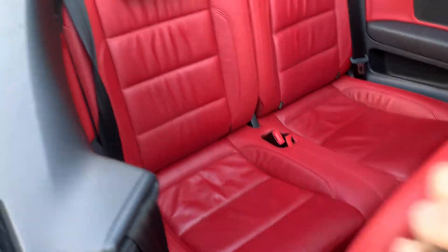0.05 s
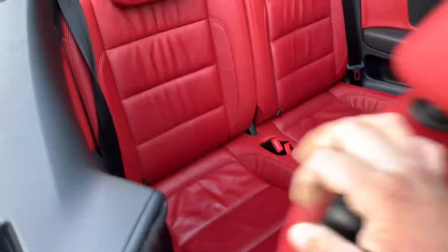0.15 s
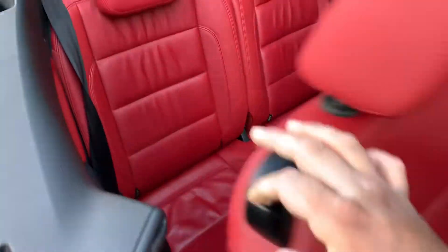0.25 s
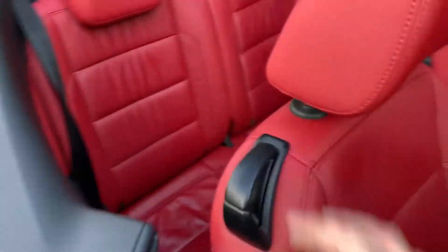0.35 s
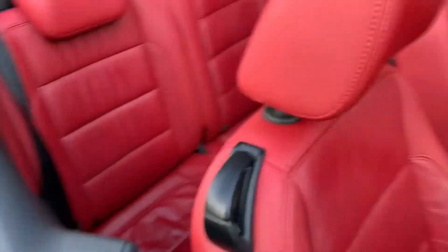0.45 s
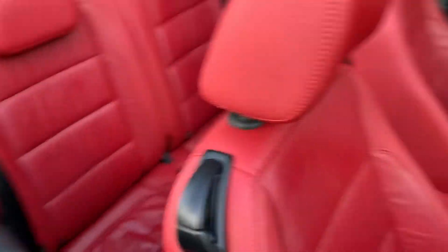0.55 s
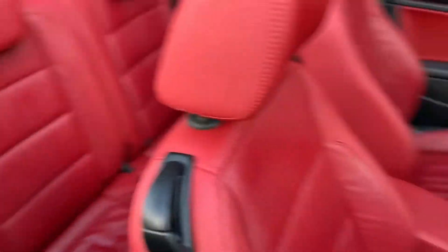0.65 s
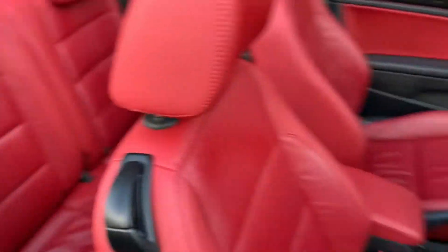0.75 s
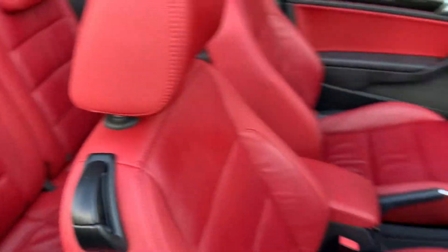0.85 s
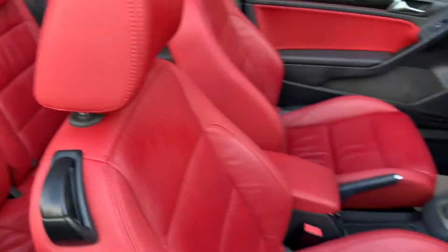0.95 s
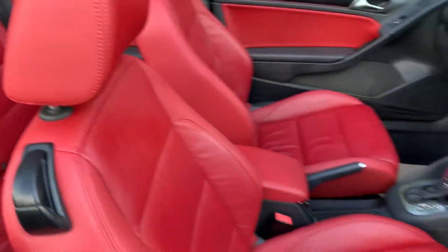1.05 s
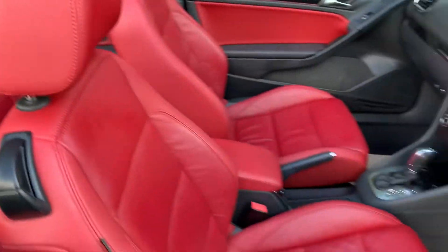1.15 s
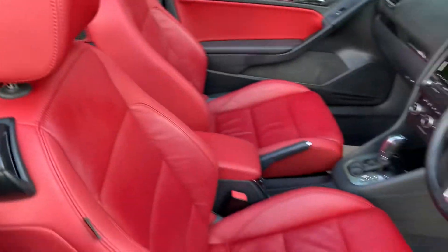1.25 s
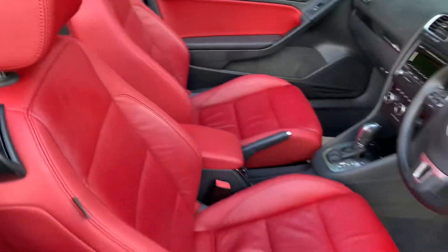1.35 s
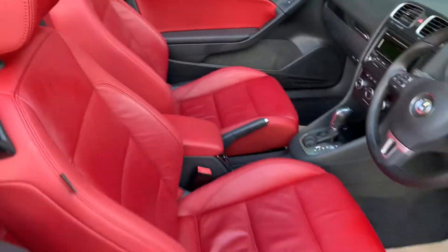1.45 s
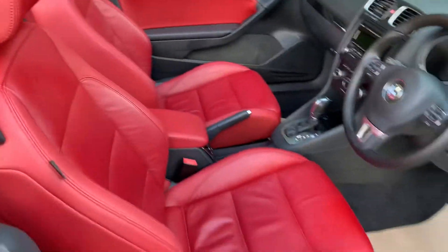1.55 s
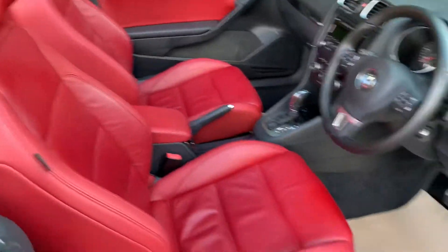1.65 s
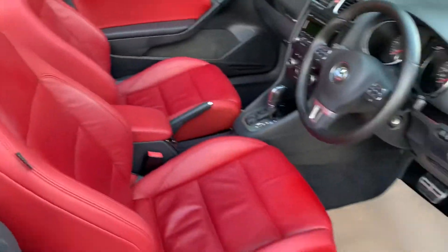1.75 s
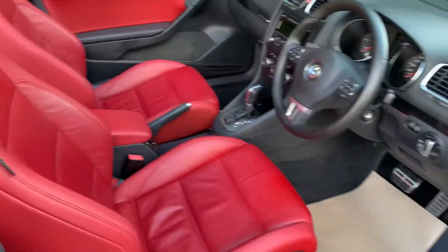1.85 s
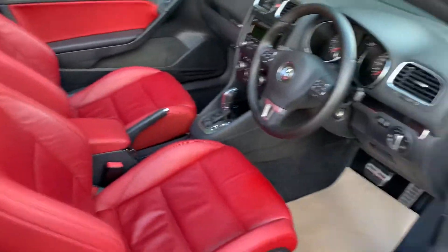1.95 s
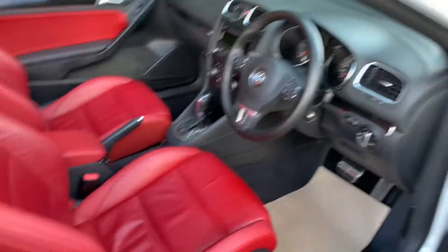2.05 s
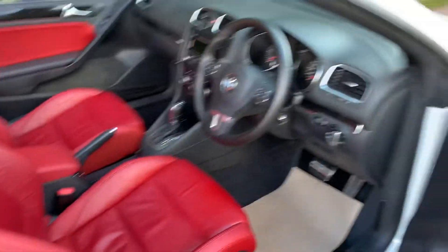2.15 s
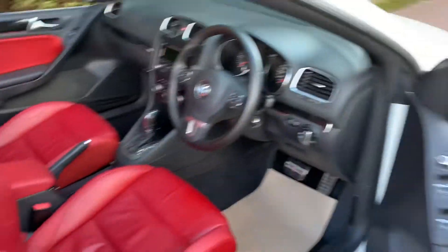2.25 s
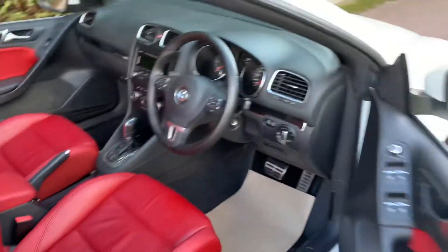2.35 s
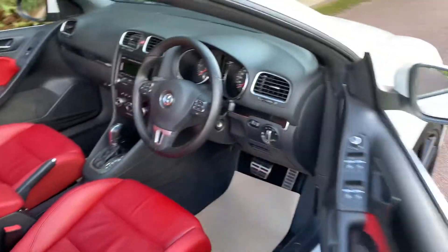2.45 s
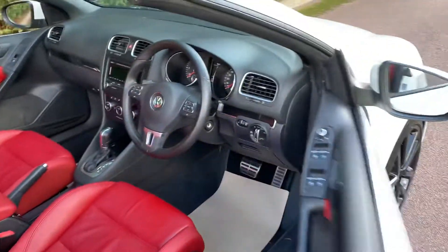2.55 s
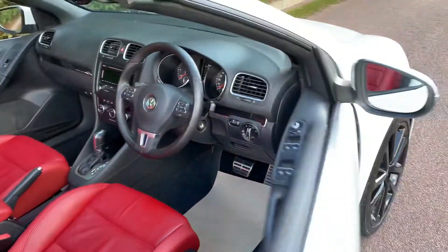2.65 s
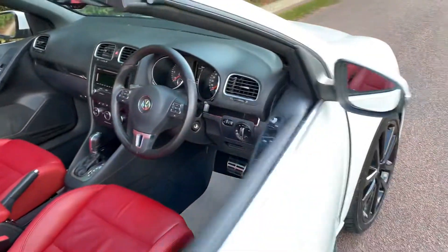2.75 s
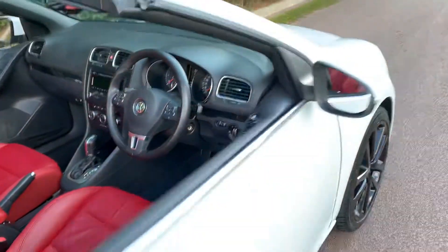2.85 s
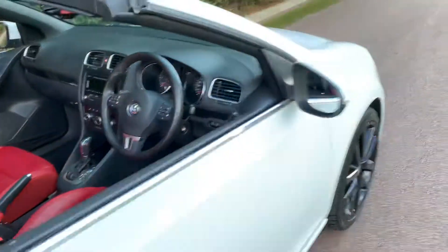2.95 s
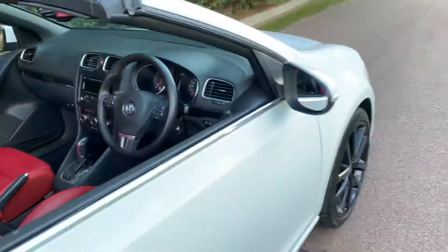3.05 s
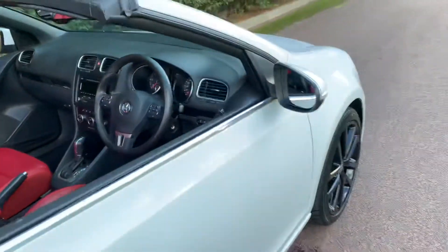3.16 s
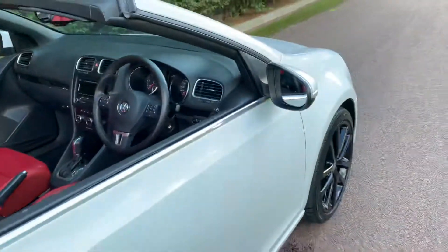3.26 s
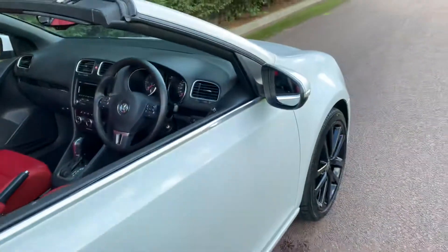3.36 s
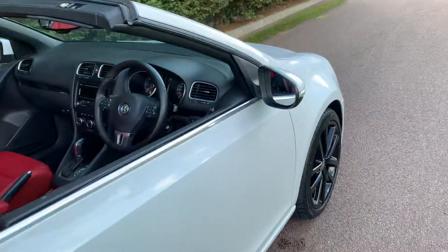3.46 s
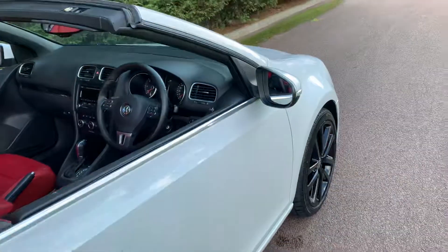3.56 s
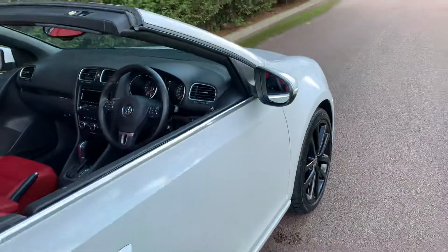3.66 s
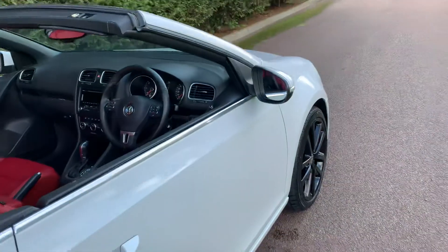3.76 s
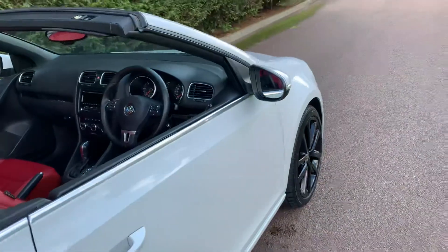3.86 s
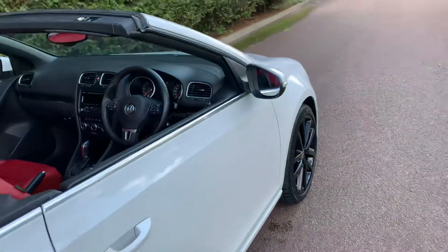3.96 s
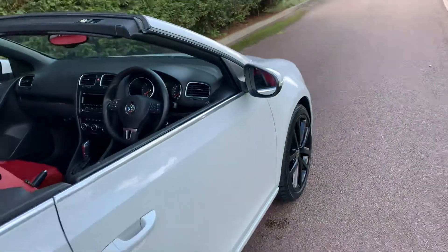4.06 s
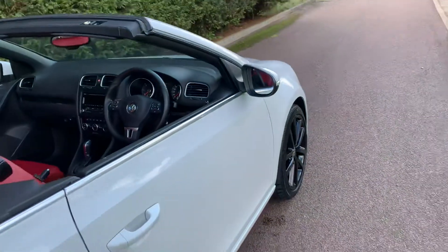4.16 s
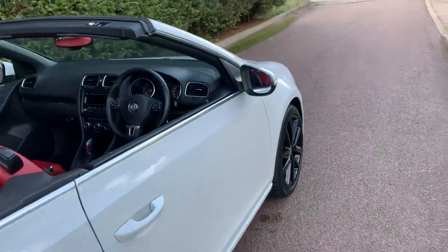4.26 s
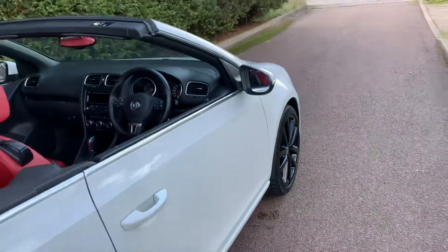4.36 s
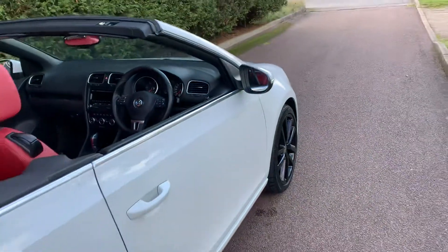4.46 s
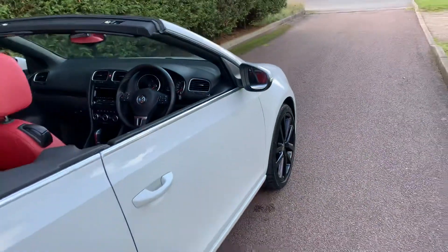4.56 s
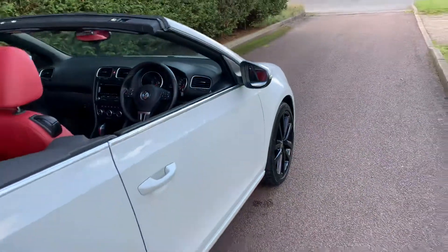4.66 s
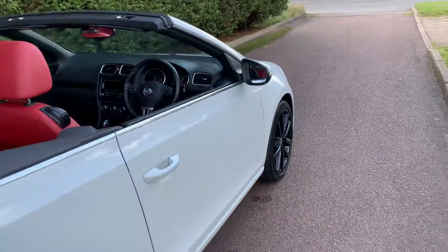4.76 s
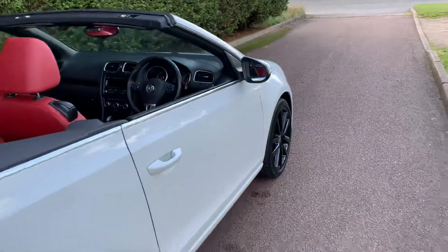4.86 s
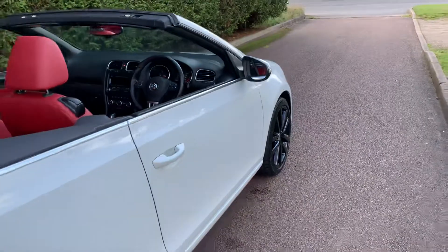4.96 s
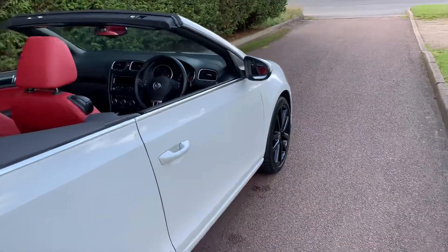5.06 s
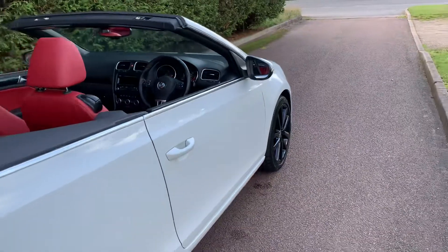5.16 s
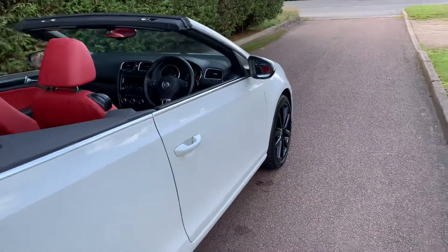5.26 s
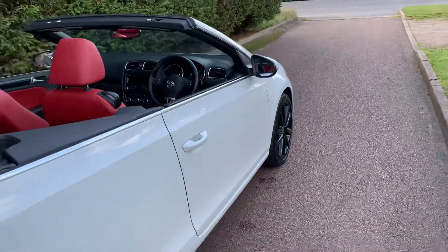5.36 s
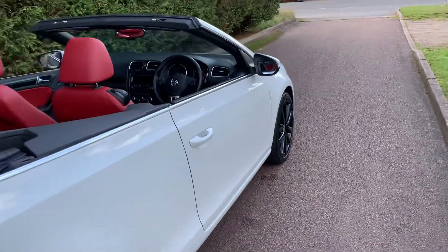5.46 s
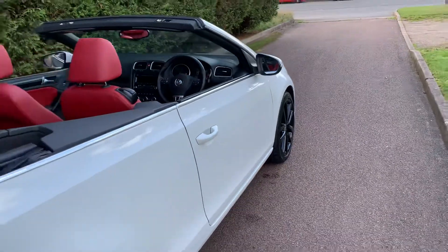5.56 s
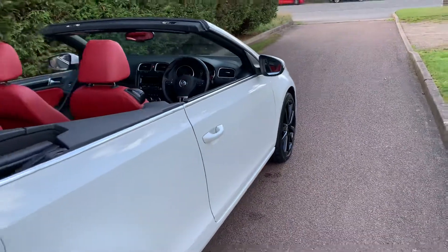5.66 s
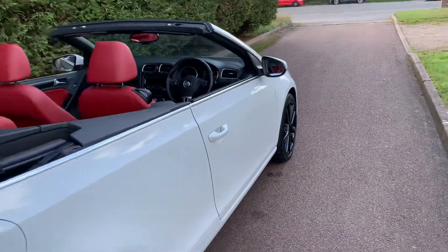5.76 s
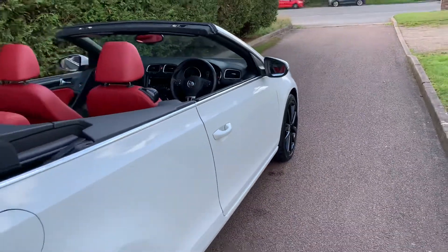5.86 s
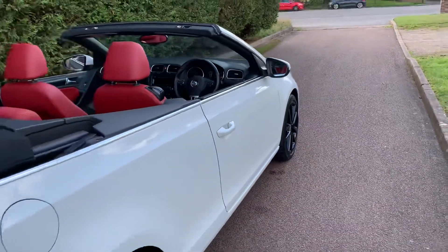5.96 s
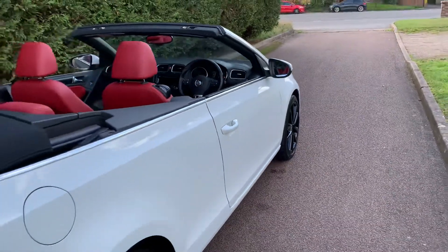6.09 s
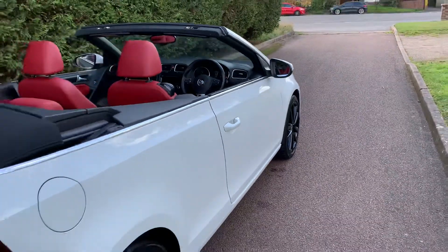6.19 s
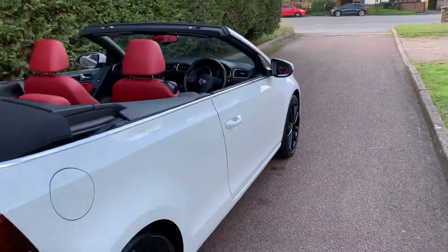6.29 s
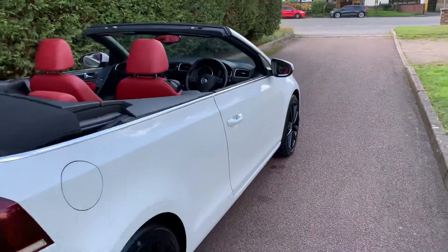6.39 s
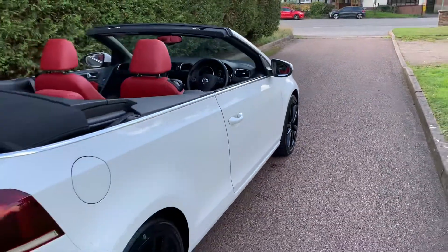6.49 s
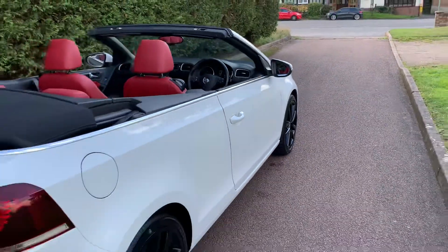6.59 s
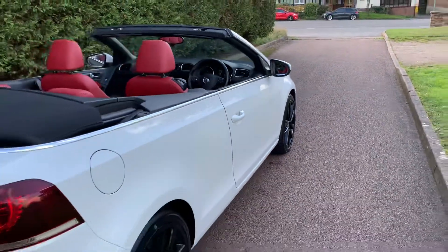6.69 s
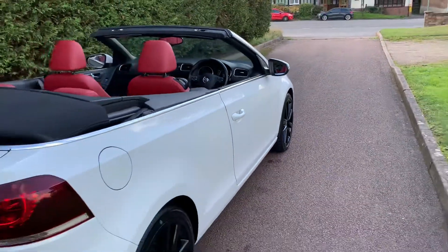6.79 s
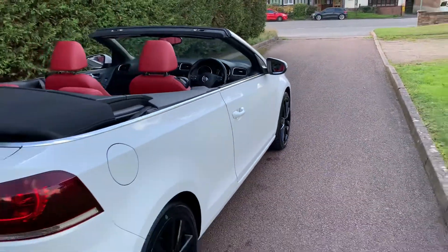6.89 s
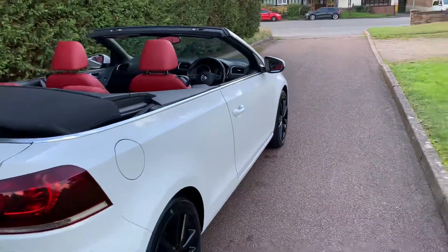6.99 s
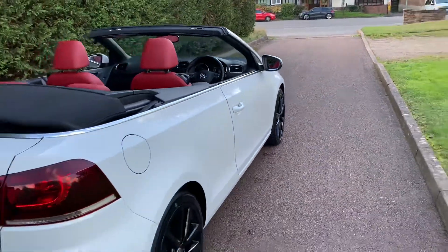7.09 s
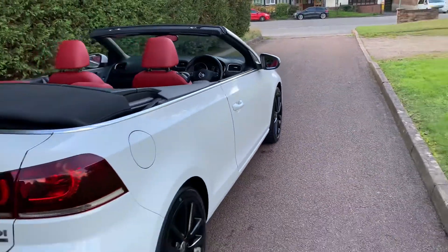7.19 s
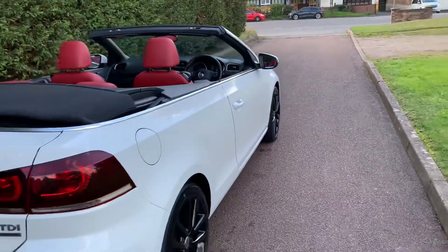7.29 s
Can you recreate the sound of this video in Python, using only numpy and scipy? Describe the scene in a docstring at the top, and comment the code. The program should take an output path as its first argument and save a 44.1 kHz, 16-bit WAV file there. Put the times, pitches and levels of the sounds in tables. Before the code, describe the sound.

Soft seat-back clunk at the start, passing tyre roar, then a heavy two-stage door slam over a faint low engine hum on a driveway.

```python
"""A driveway beside an open convertible: a seat back is pushed upright and latches, then the door is slammed.
Each blow sums decaying low modes, dense panel noise in octave bands and the bright snap of a metal catch.
Ticks, scuffs and brushes of handling are short noise bursts. A distant engine is a sum of cycle harmonics with
puffs ringing its pipe; cars on the road are shaped noise. A hand-held phone hears it all through two ports."""
import sys
import numpy as np
from scipy import signal
from scipy.fft import rfft, irfft, next_fast_len
from scipy.io import wavfile
from scipy.ndimage import uniform_filter1d, minimum_filter1d

SR = 44100
rng = np.random.default_rng(int(sys.argv[2]) if len(sys.argv) > 2 else 0)


def store_pcm(level_fs):
    """Save levels as 16-bit WAV."""
    pcm = np.round(np.clip(level_fs, -1, 1) * 32767).astype(np.int16)
    wavfile.write(sys.argv[1], SR, np.atleast_2d(pcm).T)


N = 323253
T = np.arange(N) / SR
RING_T = T[:SR]  # time since a blow, up to 1 s

# Columns in dB are relative: the levels that apply within a source add to one another.
# Steady far-off wash of the town: [pitch_hz, level_db]
TOWN_COLOUR = [(200, -19), (600, -3), (1300, 4.5), (2100, -1.5), (2900, -13.5), (4500, -35), (8000, -41.5),
               (16000, -40.5)]
# Low rumble, deep part and body: [pitch_hz, level_db]
RUMBLE_COLOUR = [(20, -34), (33, -11), (44, 6.5), (56, 8.5), (70, -8), (100, 1), (130, -24), (250, -61.5)]
BODY_COLOUR = [(60, -23.5), (105, 2.5), (170, -1), (260, -1), (350, -5.5), (500, -6.5), (800, -28.5),
               (2000, -59.5)]
# Course of the rumble: [time_s, deep_db, body_db]
RUMBLE_LEVEL = [(0, -40, -46.5), (1.0, -39.5, -42.5), (2.0, -43.5, -39.5), (3.6, -44, -38.5),
                (5.0, -45, -40.5), (6.95, -46.5, -47), (7.25, -34, -45.5)]
# Tyre roar as heard over the cabin, then out on the drive: [pitch_hz, level_db]
ROAR_CABIN = [(200, -11.5), (300, 1.5), (400, -8), (550, -5), (700, 0), (880, 0.5), (1100, 1.5),
              (1300, -3.5), (1600, -14.5), (2100, -8.5), (2450, -17.5), (2800, -25), (3600, -27.5),
              (6000, -71.5)]
ROAR_DRIVE = [(300, -18.5), (480, -7), (700, -6), (950, -2.5), (1300, -8), (1600, -12), (2100, -20),
              (3200, -43.5), (6000, -73)]
# Tyre hiss: [pitch_hz, level_db]
HISS_COLOUR = [(1800, -22.5), (3000, -1.5), (3700, 4), (4300, 3), (5400, -9), (6300, -9.5), (7200, -15),
               (8500, -33.5), (11000, -25), (16000, -32)]
# Shading of the left port from the road by the cabin: [pitch_hz, left_minus_right_db]
CABIN_BALANCE = [(550, -4), (780, -6), (1000, -7.5), (1200, -0.5)]
# Cars passing the gap in the hedge:
# [nearest_s, roar_db, hiss_db, half_amplitude_s, extra_left_lag_s, tread_hz, tread_db]
CARS = [(1.72, -33, -57.5, 0.59, 0.00028, 893, -44), (3.55, -38.5, -64, 0.48, 0.000065, 1020, -44.5),
        (5.2, -40, -73, 0.55, 0.000056, 922, -44.5)]

# Distant engine: [time_s, firing_hz]
FIRING = [(0, 78.19), (5.7, 78.88), (6.1, 77.57), (7, 78.8), (7.33, 75.3)]
# Harmonics of the engine cycle: [multiple_of_cycle_rate, level_db]
ENGINE_ORDERS = [(3, -28), (4, -21.5), (5, -0.5), (10, -22.5), (15, -24.5)]
# Hum, swelling and dipping as the phone moves: [time_s, level_db]
HUM_LEVEL = [(0, -45.5), (1.5, -39.5), (2.2, -35), (2.55, -43.5), (3.3, -29.5), (3.68, -29), (3.9, -35),
             (4.38, -25.5), (4.95, -35.5), (5.17, -28.5), (5.5, -28), (5.64, -36.5), (6.17, -26),
             (6.51, -34), (6.62, -30), (6.73, -41), (6.83, -31.5), (7.15, -39), (7.33, -27.5)]
# Throb of the exhaust, before THROB_TRIM_DB: [time_s, level_db]
THROB_LEVEL = [(3.1, -48), (3.5, -30), (3.8, -27.5), (4.1, -30.5), (4.4, -26.5), (4.79, -32), (4.87, -37.5),
               (5.42, -46), (5.52, -35), (6.15, -41), (6.45, -68)]

# Ticks of handling and grit underfoot, loud and faint: [start_s, level_db, t60_s]
TICKS = [(0.62, -60, .02), (1.3716, -31.5, 0.016), (1.965, -49.5, 0.065), (2.196, -43, 0.024),
         (2.292, -43, .03), (2.512, -38, 0.06), (3.236, -54.5, 0.044), (3.732, -49, 0.024),
         (5.296, -44.5, 0.054), (5.7845, -49, .02), (6.4623, -48, 0.011), (6.5443, -50, 0.017),
         (6.862, -44.5, 0.034), (7.1145, -43, .012), (7.1647, -54, 0.033)]
# Spectrum of a tick: [pitch_hz, level_db]
TICK_COLOUR = [(600, -20), (2000, -15), (4200, 1), (7000, -1.5), (11000, 0.5), (16000, 0)]
# Scuffs and knocks in one resonance each: [start_s, centre_hz, width_hz, level_db, t60_s]
SCUFFS = [(.085, 181, 122, -31.5, 0.2), (.248, 1100, 1500, -28, 0.069), (.47, 149, 120, -34, 0.36),
          (0.619, 2800, 2490, -40.5, 0.023), (2.196, 1200, 1400, -34, 0.072),
          (2.513, 850, 1490, -32, 0.099), (2.805, 278, 300, -32, 0.12), (4.748, 1125, 880, -43, 0.37)]
# Small hard piece that scrapes and clinks underfoot: [centre_hz, width_hz, level_db, t60_s]
CLINK_MODES = [(2207, 500, -49, .05), (3480, 300, -47, .045), (4160, 200, -48, .07)]
# Soft brushes of sleeve and shoe: [centre_s, spread_s, rasp_db, sizzle_db]
BRUSHES = [(0.094, 0.026, -54.5, -56.5), (0.256, 0.0084, -39.5, -62), (.392, 0.014, -60, -78.5),
           (0.531, 0.032, -61.5, -80), (0.686, 0.022, -56.5, -62), (1.265, .015, -59, -73),
           (1.378, 0.016, -52, -68), (1.436, 0.016, -51.5, -58), (2.31, .019, -52.5, -60),
           (2.566, 0.033, -60, -68), (3.99, 0.014, -57.5, -66), (5.335, .2, -65.5, -73),
           (6.385, 0.014, -62.5, -74), (6.869, .02, -63, -68), (7.165, 0.011, -54, -71)]
# Lower and upper spectrum of a brush: [pitch_hz, level_db]
RASP_COLOUR = [(1000, -11.5), (3300, 2), (4500, -4.5), (6500, -6), (9000, -19.5), (16000, -40)]
SIZZLE_COLOUR = [(4000, -35.5), (8000, -7.5), (10500, -1.5), (13500, -5), (15500, 1), (18000, -20)]

# Blows of the seat back: [start_s, frame_thump_db, trim_clatter_db, catch_click_db]
SEAT_BLOWS = [(0.2552, -25.5, -2, 2), (0.2567, 2, 0, -12), (0.275, -8.5, -21.5, -36),
              (0.3078, -10, -15.5, -40), (0.319, -12, -21, -45), (.354, -12.5, -25.5, -54),
              (.411, -11, -22.5, -57), (.428, -12.5, -29, -64)]
# Modes of the seat frame and cabin: [pitch_hz, level_db, t60_s]
SEAT_MODES = [(42, -32, 1.2), (61.1, -35, 1.4), (75.6, -26, 0.6), (114.3, -26, 0.49), (179, -35, 0.51),
              (203, -13.5, 0.096), (255, -18.5, 0.12), (420, -28, 0.11), (590, -10.5, 0.045),
              (640, -16.5, .035), (1280, -36, 0.049), (1580, -19.5, 0.05), (2300, -36.5, 0.075)]
# Dense ringing of the seat trim: [pitch_hz, octave_band_db, t60_s]
SEAT_TRIM = [(60, -25, 0.47), (202.7, -36, 1), (403, -31, 0.37), (800, -12.5, 0.029), (1598, -22, 0.057),
             (3240, -25.5, 0.065), (6240, -42.5, 0.054), (13690, -41.5, .05)]
# Metal catch of the seat: [centre_hz, width_hz, level_db]
SEAT_CATCH = [(3500, 2500, -23.5), (7400, 1300, -14.5), (10100, 1700, -19.5), (15120, 4000, -15)]
# Knocks of the seat's hinge and plastic trim: [start_s, centre_hz, width_hz, level_db, t60_s]
SEAT_KNOCKS = [(.2575, 617, 161, -13, 0.047), (0.2587, 530, 120, -15, .06), (.3125, 560, 500, -25.5, 0.075),
               (.3485, 1100, 900, -33.5, 0.028), (.3555, 560, 300, -26.5, .05),
               (.3615, 1200, 900, -34.5, .03), (.411, 229, 160, -29, 0.14)]
# Last soft bounce of the seat, one row: [start_s, pitch_hz, level_db, t60_s]
SEAT_SETTLE = (.49, 59.2, -18.5, .36)

# Blows of the door, from seal to lock to rebound: [start_s, shell_thump_db, panel_clatter_db, latch_click_db]
DOOR_BLOWS = [(2.9459, -11.5, 3.5, -18), (2.951, 10.5, -4, -6), (2.964, -4.5, -8.5, -6),
              (2.976, -10.5, -5.5, -3), (2.981, 3, 9.5, -7.5), (2.991, -10, 2, -12.5), (2.998, 4, 0, -29),
              (3.0167, 4.5, 4, -9.5), (3.0211, 5, 1, -30.5), (3.041, -9, -10, -37),
              (3.109, -25, -33, -30.5)]
# Modes of the door shell, cabin air and window glass: [pitch_hz, level_db, t60_s]
DOOR_MODES = [(45.95, -27, 0.74), (60.35, -23.5, 0.91), (71, -25, 0.28), (93, -16, 0.45), (136, -24, 0.84),
              (203, -18.5, 0.22), (243.4, -19.5, 0.3), (272, -20.5, .25), (304, -19.5, 0.24),
              (386, -24, 0.12), (453.6, -16.5, 0.14), (574, -24.5, 0.15), (643, -23.5, 0.11),
              (706, -22.5, 0.16), (1303, -30.5, 0.14), (1620, -48.5, 0.16), (1990, -32.5, 0.15),
              (2140, -24, 0.18)]
# Dense ringing of the door panels: [pitch_hz, octave_band_db, t60_s]
DOOR_PANELS = [(50, -27, 0.42), (130, -13.5, 0.44), (285.5, -22.5, 0.24), (550, -10.5, 0.11),
               (1090, -26, 0.13), (2023, -27.5, 0.17), (3190, -41, 0.28), (5000, -35, .11),
               (8000, -44, 0.11), (14040, -41, .09)]
# Metal catch of the door: [centre_hz, width_hz, level_db]
DOOR_LATCH = [(2600, 1100, -24.5), (4350, 1500, -15.5), (6600, 1500, -21), (11100, 2500, -18),
              (15300, 1500, -24.5)]
# Ring of the steel latch: [pitch_hz, level_db, t60_s]
LATCH_RING = [(2700, -35.5, .14), (3092, -47, .15), (3730, -37.5, .12), (3960, -25.5, .14),
              (4300, -19.5, .14), (4270, -35.5, 0.151), (4570, -42, 0.14), (6900, -43, 0.11),
              (10900, -34, 0.06)]
# The two latch stages, where the pawl drops onto the striker: [start_s, pitch_hz, level_db]
LATCH_CRACKS = [(2.9764, 4550, -2.5), (3.0169, 4750, -2)]
# Ring of the pawl: [multiple_of_pitch, level_db, t60_s]
PAWL_MODES = [(.29, -9, .008), (.46, -7, .007), (.63, -9, .006), (.93, 0, .007), (1.05, -1, .006),
              (1.27, -7, .004), (1.48, -8, .004), (2.5, -11, .003)]
# Knocks of the seal, window glass and door trim: [start_s, centre_hz, width_hz, level_db, t60_s]
DOOR_KNOCKS = [(2.935, 1030, 397, -20.5, 0.094), (2.942, 620, 401.5, -16, 0.14),
               (2.947, 1350, 895, -12, 0.017), (2.9485, 550, 350, -13.5, 0.027),
               (2.95, 272, 140.1, 2.5, 0.065), (2.985, 301, 49.9, -13, 0.25), (3.003, 698, 300, -13, .09),
               (3.029, 2390, 2200, -16, 0.036), (3.048, 560, 400, -19.5, .07),
               (3.055, 115.5, 60.3, -11, 0.45), (3.066, 3180, 3000, -34, 0.051)]
# Air shoved into the cabin by the door, one row: [start_s, first_hz, last_hz, level_db, t60_s]
CABIN_PUSH = (2.953, 140, 53, 5, .27)

# Part of each sound that differs between the ports:
# [pitch_hz, seat_db, door_db, surroundings_db, passing_cars_db]
DIFFUSE = [(60, -18.5, -24, -9.5, -19.5), (249.4, -14, -15.5, -17, -17.5), (550, -8.5, -13, -14, -15.5),
           (1190, 2.5, -14, -5, -8.5), (2100, 5, 0, 1, -4.5), (4000, -10, 1, 0, -3.5),
           (6970, -19.5, -26, -3, -4.5), (14700, -20.5, -26, -31, -10)]
SEAT, DOOR, SURROUNDINGS, PASSING_CARS = 1, 2, 3, 4  # its columns
# Left port against right port: [pitch_hz, left_minus_right_db]
PORT_BALANCE = [(50, -3.5), (130, -2), (280, -0.5), (550, -1), (1200, 1.5), (2300, 2), (4500, -3),
                (9000, 0)]

TOWN_DB, FAR_ROAR_DB, FAR_HISS_DB = -51, -45.5, -67.5  # town, then steady traffic behind the cars
LEAVE_CABIN_S = (2.1, 2.4)  # the phone is drawn out of the cabin between these times
RETREAT_S = 5.2  # then it backs away
RETREAT_DB_PER_S, HISS_RETREAT_DB_PER_S = 1, 4  # traffic and drone; steady far hiss
DRONE_HZ, DRONE_WIDTH_HZ, DRONE_DB = 176.6, 77, -44  # low drone, faded in shortly before the phone backs away
DRONE_RISE_S = (4.8, 5.17)  # from silence to full
FLICKER_DB, TREAD_FLICKER_DB, TREAD_WIDTH_HZ = .5, 3, 330
HISS_LATE_S = .12  # hiss beams from behind the tyres, so it peaks later

HUM_WAVER_DB, THROB_TRIM_DB = 1.12, -5
EXHAUST_HZ, EXHAUST_WIDTH_HZ, GAS_SHARE = 398.5, 130, .35  # pipe resonance and its rushing gas
PUFF_SCATTER_DB, PUFF_SLIP_RAD = 3, .6  # largest deviations from puff to puff
PUFF_WIDTH, PUFF_JITTER = .12, .14  # shares of a cycle
PUFF_FLOOR = .7  # gain of the broad part of a puff

CLINK_S, CLINK_RISE_S, TICK_RISE_S = 7.1612, .002, .0012
BRUSH_GRAIN_DB, BRUSH_GRAINS_PER_S = 2.5, 900

SEAT_PAD_HZ = 1100  # padding dulls a blow above this pitch times its thump gain
SEAT_CORNER_HZ, DOOR_CORNER_HZ = 18000, 60000  # clatter corners, times the clatter gain of the blow
SEAL_S, SEAL_HZ, SEAL_WIDTH_HZ, SEAL_DB = 2.937, 1150, 1300, -24
SEAL_SQUEEZE_S, SEAL_T60_S = .006, .19
PUSH_SAG_S, PUSH_RISE_S = .012, .0085  # time constants of the sinking pitch and of the attack

PORT_LAG_S = 8 / 44100
LIMIT_DB, LIMIT_HOLD_S, LIMIT_SLEW_S = -6.5, .14, .015
LOW_CUT_HZ, TOP_HZ = 36, 16000
CEILING = 1.2  # amplitude that the rounded peaks approach


def amp(db):
    """Decibel law: 20 dB is a tenfold amplitude."""
    return 10 ** (np.asarray(db) / 20)


def at_hz(table, hz, column=1):
    """Pitch is logarithmic: read a column of a table along log frequency."""
    table = np.array(table, float)
    return np.interp(np.log(np.maximum(hz, 1)), np.log(table[:, 0]), table[:, column])


def curves(table):
    """Linear interpolation: the columns of a time table, one value a sample."""
    s, *columns = np.transpose(table)
    return [np.interp(T, s, column) for column in columns]


def walk(rate):
    """Slow random fluctuation: random steps, rate per second, smoothed to a spread near 1."""
    size = int(SR / rate)
    held = np.repeat(rng.standard_normal(N // size + 1), size)
    return uniform_filter1d(held, size)[:N] * np.sqrt(3 / 2)


def noise(gain_at, size, diffuse=SURROUNDINGS):
    """Partial coherence: two-port noise of rms 1, a common part plus a part of opposite sign in the ports."""
    length = next_fast_len(size)
    hz = np.fft.rfftfreq(length, 1 / SR)
    common, apart = np.exp(2j * np.pi * rng.random((2, len(hz))))
    apart = apart * amp(at_hz(DIFFUSE, hz, diffuse))
    ports = np.array([common + apart, common - apart])
    x = irfft(ports * gain_at(hz), length)[:, :size]
    return x / x.std()


def coloured(colour, size=N):
    """Spectral shaping: noise with a given spectrum."""
    return noise(lambda hz: amp(at_hz(colour, hz)), size)


def band(centre, width, size, diffuse=SURROUNDINGS):
    """Resonance: noise in one steep-sided band, width taken between its half-amplitude points."""
    def gain_at(hz):
        detuning = (hz ** 2 - centre ** 2) / (np.maximum(hz, 1) * width)
        return 1 / (1 + detuning ** 2)
    return noise(gain_at, size, diffuse)


def fade(t60):
    """Damping: the exponential decay of a struck body, 60 dB in t60 seconds."""
    return np.exp(-np.log(1000) * RING_T / max(t60, 1e-3))


def swell(rise_s, t60):
    """Energy build-up: a rounded attack, then a decay."""
    return (1 - np.exp(-RING_T / rise_s)) * fade(t60)


def add(out, s, sound):
    """Superposition: mix a sound in at time s."""
    start = max(int(s * SR), 0)
    out[:, start:start + sound.shape[-1]] += sound[..., :N - start]


def pan(x, left_db):
    """Level difference: favour the left port over the right by left_db."""
    return x * amp(np.array([[left_db], [-left_db]]) / 2)


def from_road(colour, lag_s, balance=None):
    """Directional delay: noise reaches the left port lag_s later, and perhaps shaded."""
    def gain_at(hz):
        tilt = amp(at_hz(balance, hz) / 2) if balance else np.ones(len(hz))
        left_delay = np.exp(-2j * np.pi * hz * lag_s)
        return amp(at_hz(colour, hz)) * np.array([tilt * left_delay, 1 / tilt])
    return noise(gain_at, N, PASSING_CARS)


def cars():
    """Pass-by: tyre noise swells and sinks around the nearest point, with treads singing in a narrow band."""
    out, outside = 0, np.interp(T, LEAVE_CABIN_S, [0, 1])
    for s, roar_db, hiss_db, half_s, lag_s, tread_hz, tread_db in CARS:
        # equal-power crossfade of colour as the phone leaves the cabin
        tyres = np.sqrt(1 - outside) * from_road(ROAR_CABIN, lag_s, CABIN_BALANCE)
        tyres = tyres + np.sqrt(outside) * from_road(ROAR_DRIVE, lag_s)
        tread_gain = amp(tread_db + TREAD_FLICKER_DB * walk(25))
        tread = tread_gain * band(tread_hz, TREAD_WIDTH_HZ, N, PASSING_CARS)
        roar = amp(roar_db + FLICKER_DB * walk(21)) * tyres + tread
        hiss = amp(hiss_db + FLICKER_DB * walk(13)) * from_road(HISS_COLOUR, lag_s)
        # a bell curve gives the hiss shorter tails than the roar
        hiss_pass = np.exp(-.5 * ((T - s - HISS_LATE_S) / half_s) ** 2)
        out = out + roar / (1 + ((T - s) / half_s) ** 2) + hiss * hiss_pass
    return out


def road():
    """Attenuation with distance: cars, far traffic and drone weaken on retreat; deep rumble and town do not."""
    away_s = np.maximum(T - RETREAT_S, 0)
    rumble_db, body_db = curves(RUMBLE_LEVEL)
    rumble = amp(rumble_db) * coloured(RUMBLE_COLOUR)
    body = amp(body_db) * coloured(BODY_COLOUR)
    traffic = cars() + amp(FAR_ROAR_DB) * coloured(ROAR_DRIVE) + body
    drone = amp(DRONE_DB) * np.interp(T, DRONE_RISE_S, [0, 1]) * band(DRONE_HZ, DRONE_WIDTH_HZ, N)
    far_hiss = amp(FAR_HISS_DB - HISS_RETREAT_DB_PER_S * away_s) * coloured(HISS_COLOUR)
    town = amp(TOWN_DB) * coloured(TOWN_COLOUR)
    return rumble + amp(-RETREAT_DB_PER_S * away_s) * (traffic + drone) + far_hiss + town


def engine_hum(turns):
    """Harmonic series: wavering sines at multiples of the engine cycle, strongest at the firing rate."""
    hum = 0
    for order, db in ENGINE_ORDERS:
        phase = 2 * np.pi * (round(order) * turns + rng.random())
        hum = hum + amp(db + HUM_WAVER_DB * walk(13)) * np.sin(phase)
    return np.sqrt(2) * hum


def exhaust(turns, cycle_hz):
    """Pulse-excited resonance: once a cycle a puff of uneven strength and timing rings the pipe."""
    scatter = rng.uniform(-1, 1, (N // 1000, 3))  # one row a cycle
    strength, slip, late = scatter[turns.astype(int)].T
    within = turns % 1  # share of the cycle elapsed
    tone = np.sin(2 * np.pi * EXHAUST_HZ * within / cycle_hz + PUFF_SLIP_RAD * slip)
    pipe = tone + GAS_SHARE * band(EXHAUST_HZ, EXHAUST_WIDTH_HZ, N)
    broad = PUFF_FLOOR * np.sqrt(np.sin(np.pi * within))
    peak = np.exp(-.5 * ((within - .5 - PUFF_JITTER * late) / PUFF_WIDTH) ** 2)
    return pipe * (broad + peak) * amp(PUFF_SCATTER_DB * strength) / np.sqrt(2)


def engine():
    """Periodic source: five firings a cycle drive the hum, and each cycle throbs in the exhaust."""
    (firing_hz,), (hum_db,), (throb_db,) = curves(FIRING), curves(HUM_LEVEL), curves(THROB_LEVEL)
    cycle_hz = firing_hz / 5
    turns = np.cumsum(cycle_hz) / SR
    hum = engine_hum(turns) * amp(hum_db)
    return hum + exhaust(turns, cycle_hz) * amp(throb_db + THROB_TRIM_DB)


def brushes():
    """Friction noise: bell-shaped bursts of rasp and sizzle, roughened by a fast random grain."""
    rasp, sizzle = coloured(RASP_COLOUR), coloured(SIZZLE_COLOUR)
    rustle = 0
    for s, spread_s, rasp_db, sizzle_db in BRUSHES:
        stroke = np.exp(-.5 * ((T - s) / spread_s) ** 2)
        rustle = rustle + stroke * (amp(rasp_db) * rasp + amp(sizzle_db) * sizzle)
    return rustle * amp(BRUSH_GRAIN_DB * walk(BRUSH_GRAINS_PER_S))


def handling():
    """Light impacts and friction: dry ticks, scuffs, a clink and brushes close to the phone."""
    out = np.zeros((2, N))
    for s, db, t60 in TICKS:
        add(out, s, amp(db) * coloured(TICK_COLOUR, SR) * swell(TICK_RISE_S, t60))
    for s, hz, width, db, t60 in SCUFFS:
        add(out, s, amp(db) * band(hz, width, SR) * swell(TICK_RISE_S, t60))
    for hz, width, db, t60 in CLINK_MODES:
        add(out, CLINK_S, amp(db) * band(hz, width, SR) * swell(CLINK_RISE_S, t60))
    return out + brushes()


def ring(modes):
    """Modal superposition: the decaying sines of a struck body."""
    return sum(amp(db) * fade(t60) * np.sin(2 * np.pi * hz * RING_T) for hz, db, t60 in modes)


def thump(modes, contact_s):
    """Contact time: modes swell while a padded contact lasts."""
    return ring(modes) * (1 - np.exp(-RING_T / contact_s))


def clatter(panels, corner_hz, diffuse):
    """High modal density: panel modes merge into octave bands of noise, each swelling within a cycle."""
    out = 0
    for hz in 55 * 2. ** np.arange(9):
        # a soft blow excites the modes above its corner weakly
        gain = amp(at_hz(panels, hz)) / np.hypot(1, hz / corner_hz)
        envelope = (1 - np.exp(-RING_T * 2 * np.pi * hz)) * fade(at_hz(panels, hz, column=2))
        out = out + gain * envelope * band(hz, hz, SR, diffuse)
    return out


def click(catch, snap_t60, tail_t60, tail_db):
    """Two-stage decay: steel snaps on steel and leaves a short buzz."""
    metal = sum(amp(db) * band(hz, width, SR, SEAT) for hz, width, db in catch)
    return metal * (fade(snap_t60) + amp(tail_db) * fade(tail_t60))


def knocks(table, diffuse):
    """Bandwidth and build-up: the narrower a knock's resonance, the slower it swells."""
    out = np.zeros((2, N))
    for s, hz, width, db, t60 in table:
        add(out, s, amp(db) * band(hz, width, SR, diffuse) * swell(1 / (2 * width), t60))
    return out


def boom(s, first_hz, last_hz, db, t60):
    """Cavity resonance: a push of air whose pitch sinks to the cabin's own note as the seal closes."""
    out = np.zeros((2, N))
    hz = last_hz + (first_hz - last_hz) * np.exp(-RING_T / PUSH_SAG_S)
    add(out, s, amp(db) * swell(PUSH_RISE_S, t60) * np.sin(2 * np.pi * np.cumsum(hz) / SR))
    return out


def seat():
    """Padded impact: the seat back hits its catch and shudders; the weaker the blow, the duller."""
    out = knocks(SEAT_KNOCKS, SEAT)
    for s, thump_db, clatter_db, click_db in SEAT_BLOWS:
        force, pad_hz = amp(clatter_db), SEAT_PAD_HZ * amp(thump_db)
        padded = [(hz, db - 10 * np.log10(1 + (hz / pad_hz) ** 4), t60) for hz, db, t60 in SEAT_MODES]
        add(out, s, amp(thump_db) * thump(padded, contact_s=.00086))
        add(out, s, force * clatter(SEAT_TRIM, SEAT_CORNER_HZ * force, SEAT))
        add(out, s, amp(click_db) * click(SEAT_CATCH, snap_t60=.012, tail_t60=.09, tail_db=-22))
    add(out, SEAT_SETTLE[0], thump([SEAT_SETTLE[1:]], contact_s=.03))
    return out


def door():
    """Successive impacts: the door squeezes its seal, pushes cabin air, cracks through two latch stages, settles."""
    out = knocks(DOOR_KNOCKS, DOOR)
    shell, steel = thump(DOOR_MODES, contact_s=.00067), ring(LATCH_RING)
    squeeze = swell(SEAL_SQUEEZE_S, SEAL_T60_S) * band(SEAL_HZ, SEAL_WIDTH_HZ, SR, DOOR)
    add(out, SEAL_S, amp(SEAL_DB) * squeeze)
    for s, thump_db, clatter_db, click_db in DOOR_BLOWS:
        force = amp(clatter_db)
        snap = click(DOOR_LATCH, snap_t60=.0051, tail_t60=.086, tail_db=-3)
        add(out, s, amp(thump_db) * shell + force * clatter(DOOR_PANELS, DOOR_CORNER_HZ * force, DOOR))
        add(out, s, amp(click_db) * (steel + snap))
    for s, hz, db in LATCH_CRACKS:
        pawl = [(hz * multiple, mode_db, t60) for multiple, mode_db, t60 in PAWL_MODES]
        add(out, s, amp(db) * ring(pawl))
    return out + boom(*CABIN_PUSH)


def scene():
    """Superposition: everything that reaches the phone, from the background to the door."""
    return road() + engine() + handling() + pan(seat(), left_db=-0.7) + pan(door(), left_db=0.5)


def limit(x):
    """Gain control: a loud sound pulls the gain down, and the background stays ducked just after it."""
    slew, hold = int(LIMIT_SLEW_S * SR), int(LIMIT_HOLD_S * SR)
    level = np.sqrt(np.abs(uniform_filter1d(np.mean(x ** 2, axis=0), slew)))
    gain = amp(LIMIT_DB) / np.maximum(level, amp(LIMIT_DB))
    held = minimum_filter1d(gain, hold, origin=(hold - 1) // 2)  # the lowest gain of the recent past
    return x * uniform_filter1d(held, slew)


def record(dry):
    """Two-port reception: the left port lags in its own colour; level is limited, peaks rounded, ends cut."""
    length = next_fast_len(N + SR // 10)
    hz = np.fft.rfftfreq(length, 1 / SR)
    tilt = amp(at_hz(PORT_BALANCE, hz) / 2)
    ports = np.array([tilt * np.exp(-2j * np.pi * hz * PORT_LAG_S), 1 / tilt])
    x = irfft(rfft(dry, length) * ports, length)[:, :N]
    x = signal.sosfilt(signal.butter(4, LOW_CUT_HZ, "high", fs=SR, output="sos"), x)
    x = CEILING * np.tanh(limit(x) / CEILING)
    return signal.sosfilt(signal.ellip(8, .2, 70, TOP_HZ, fs=SR, output="sos"), x)


dry = scene()
out = record(dry)
store_pcm(out)
```